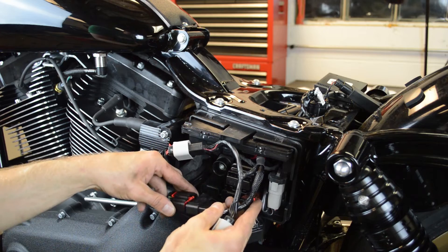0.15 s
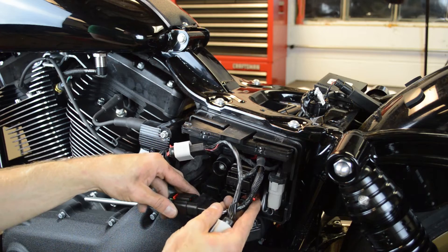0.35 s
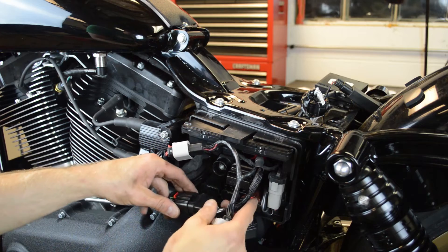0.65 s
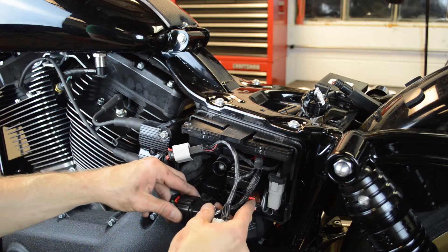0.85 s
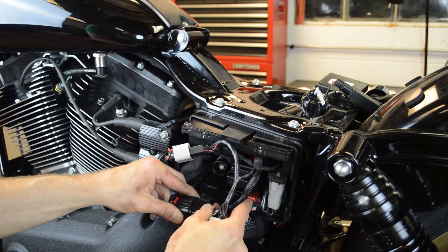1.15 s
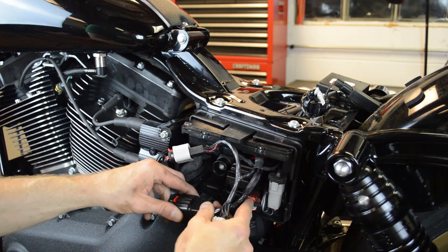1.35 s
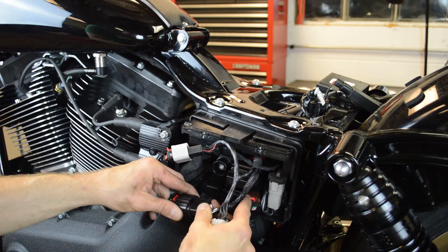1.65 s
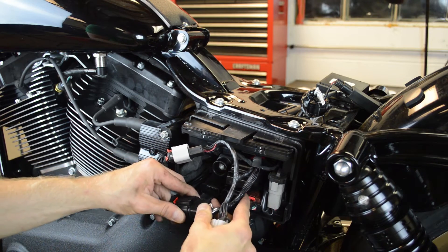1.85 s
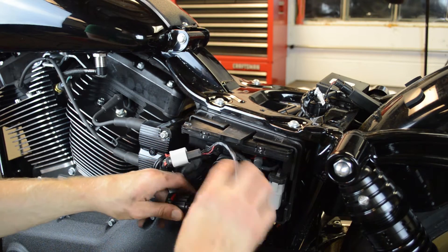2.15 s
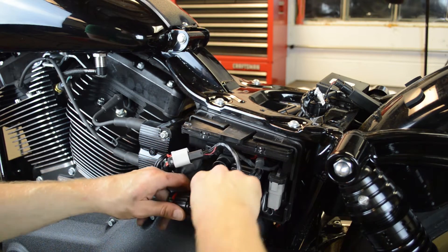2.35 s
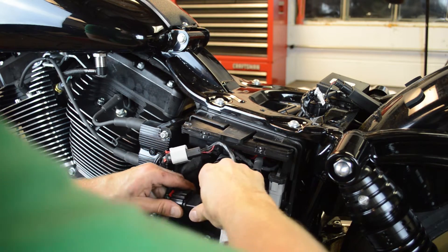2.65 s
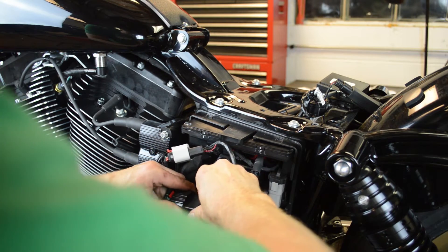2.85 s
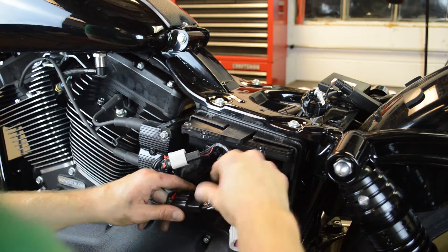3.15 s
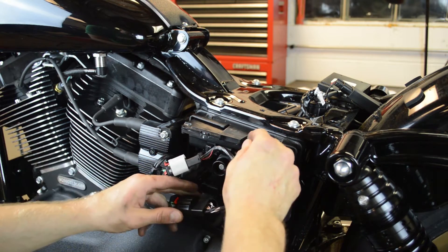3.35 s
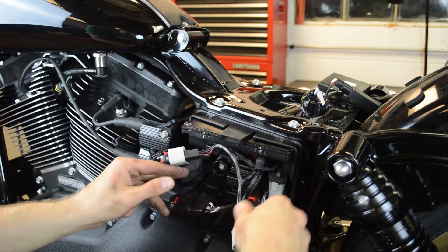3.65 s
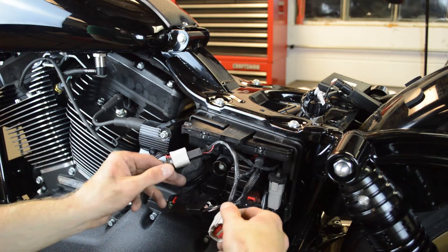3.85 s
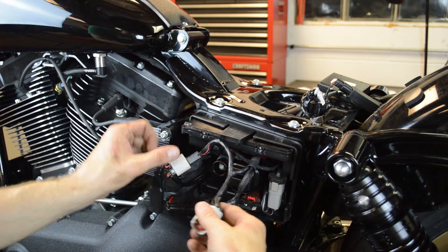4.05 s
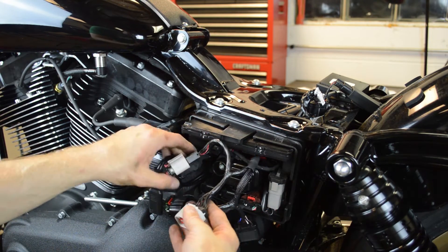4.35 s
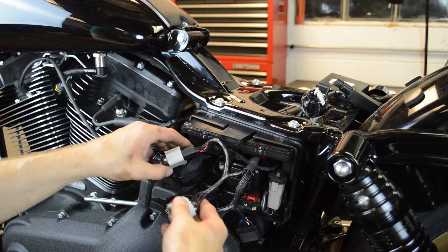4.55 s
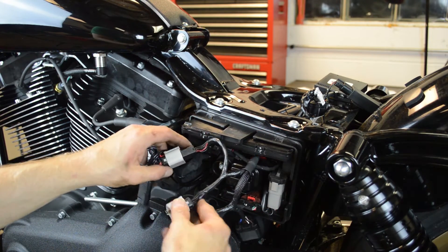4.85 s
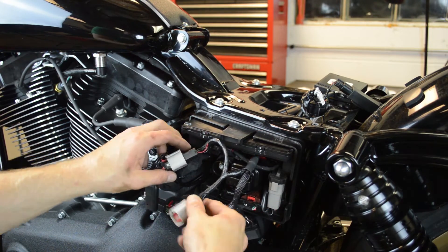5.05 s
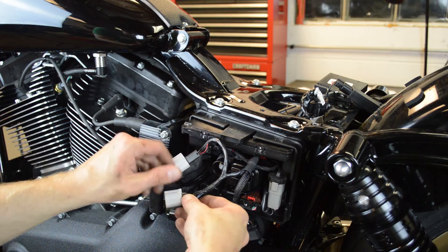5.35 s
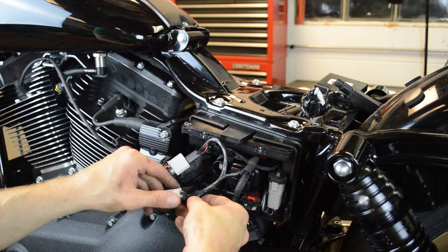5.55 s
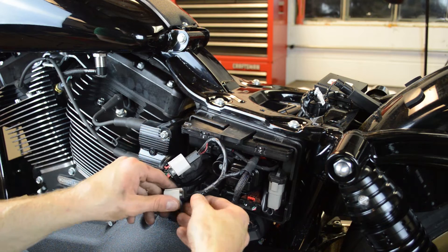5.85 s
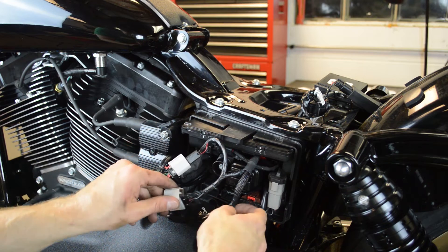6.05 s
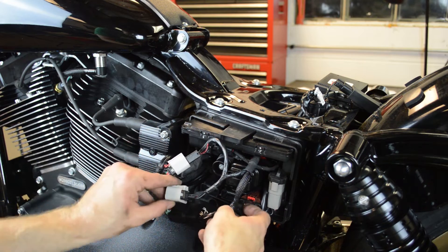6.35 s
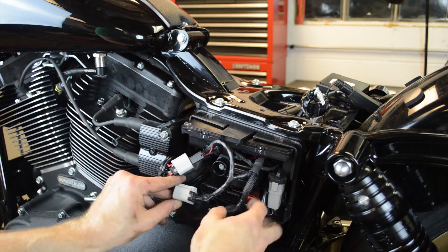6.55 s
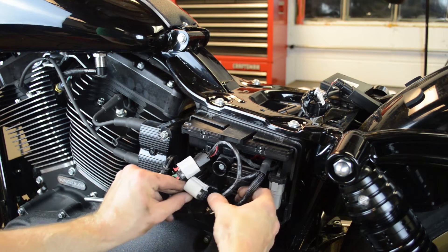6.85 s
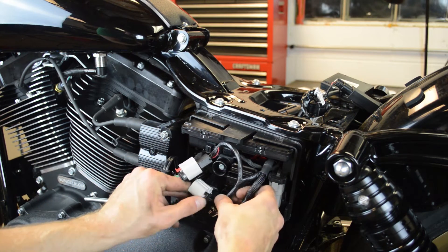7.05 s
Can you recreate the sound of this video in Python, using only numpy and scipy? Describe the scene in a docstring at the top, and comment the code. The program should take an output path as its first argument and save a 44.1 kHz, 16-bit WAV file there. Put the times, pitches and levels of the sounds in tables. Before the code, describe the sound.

Small hard plastic parts snap, tick and scuff under the fingers, heard fairly near with a little room response. The strongest snap is early; irregular small clicks thin out, a knock and cable drag come later, then a crackly pop as the plug leaves its socket. Woody taps, faint scrapes and finally a tighter flurry of rubs and ticks continue over steady ventilation rumble, weak hum and soft hiss.

```python
"""Plastic wiring connectors snap, pop and tick as hands unplug and shift them in a quiet workshop.
Latch and plug are clicks into banks of damped modes with noise cracks; each tick is a rattle ringing one housing mode.
Scrapes, rubs and drags are stick-slip noise under a stroke of pressure; thuds and a bracket ring on sine modes.
A short noise tail answers as the room, over ventilation rumble, wavering mains hum and microphone hiss."""
import sys
import numpy as np
from scipy import signal
from scipy.fft import rfft, irfft
from scipy.io import wavfile

SR = 44100
rng = np.random.default_rng(int(sys.argv[2]) if len(sys.argv) > 2 else 0)


def materialize(psi):
    """Save the field psi as 16-bit PCM at rate SR to the path in sys.argv[1].

    A 1-D psi becomes a single channel; in a 2-D psi each row is a channel.
    """
    bounded = np.clip(np.atleast_2d(psi).T, -1, 1)
    quanta = np.round(bounded * 32767).astype(np.int16)
    wavfile.write(sys.argv[1], SR, quanta)


def voltage_ratio(level):
    """Linear amplitude factor for a level in decibels (scalar or array-like)."""
    return 10 ** (np.asarray(level, float) / 20)


N = 317079

# Swells of the latch's snap: sharp onset, then re-excitations shaping the beating of close modes:
# (time [s], level before mode and layer levels [dB])
LATCH_SWELLS = [(.3529, -14.5), (.3537, -28), (.3568, -23.5), (.3655, -29.5)]
# Modes of the latch: (pitch [Hz], level against the click before the layer level [dB], t60 before the cap [s])
LATCH_MODES = [(880, -28.5, 0.01194), (1230, -20.5, .012), (1550, -21, 0.01), (1890, -26, .02),
               (2400, -2, 0.042), (2730, -12, 0.013), (2650, 4.5, 0.09), (2810, -14.5, 0.06),
               (2994, -10.5, .025), (3740, -16, 0.025), (4020, -15, 0.017), (4340, -16, 0.011),
               (5032, -22.5, 0.0061), (6326, -7.5, 0.018), (7200, -8, .015), (7530, -13, 0.0087),
               (8550, -10, 0.014), (13230, -21, .01), (14590, -25, 0.015)]


def latch():
    """A latch tab snaps: a sharp onset and re-excitations ring its plastic modes, with upper-mid cracks."""
    return struck(LATCH_SWELLS, LATCH_MODES, level_db=-12.5, crack_db=-11, crack_hz=(1800, 10000))


# Clicks as the plug leaves its socket: (time [s], level before mode and layer levels [dB])
PLUG_CLICKS = [(2.8552, -35.5), (2.8564, -40), (2.8596, -36.5), (2.8606, -39), (2.8640, -50)]
# Modes of plug and socket: (pitch [Hz], level against the click before the layer level [dB], t60 before the cap [s])
PLUG_MODES = [(263, -1, 0.015), (419, 12, 0.022), (934, -1, 0.011), (1960, -4, 0.041), (2240, 3.5, 0.012),
              (2670, 8.5, 0.0089), (3000, -13, 0.016), (3910, 15.5, 0.0041), (4900, -21, 0.0088),
              (5900, -23, .01), (7640, 2.5, 0.023), (9000, -21, 0.015), (11100, 6.5, 0.018),
              (11600, -1.5, 0.019), (12600, -9, 0.0089), (14500, 9, .01)]


def plug():
    """A plug pops apart: a cluster of clicks rings short modes under a broad crack."""
    return struck(PLUG_CLICKS, PLUG_MODES, level_db=-8.5, crack_db=3.5, crack_hz=(500, 16000))


def struck(excitations, modes, level_db, crack_db, crack_hz, spread_db=1):
    """Every excitation clicks all modes with strengths of its own and adds a dry crack of a few ms."""
    out, t = np.zeros(N), np.arange(1024) / SR
    at = [round(s * SR) for s, db in excitations]
    click_db = np.array(excitations)[:, 1]
    for k, (hz, mode_db, t60) in enumerate(modes):
        clicks = np.zeros(N)
        uneven_db = spread_db * rng.standard_normal(len(at))
        clicks[at] = voltage_ratio(click_db + mode_db + level_db + uneven_db)
        capped_t60 = np.clip(t60, .004, .005 + 55 / hz)  # high modes must die sooner
        out += (-1) ** k * ring(clicks, hz, capped_t60)
    for i, (s, db) in zip(at, excitations):
        burst = rng.standard_normal(len(t)) * np.exp(-t / 0.0012)
        out[i:i + len(t)] += voltage_ratio(db + crack_db) * band(burst, *crack_hz)
    return out


# Housings and wires touching: (time [s], peak of the ring [dB], ring [Hz], peak of the bright crack over the ring [dB])
TOUCHES = [(.0603, -59, 2760, -9), (.195, -69, 2700, 1), (.2818, -63, 1450, 0), (.4544, -45, 3360, -9),
           (.465, -54, 6200, -10), (.524, -58, 4600, -8), (.618, -54.5, 2540, -3), (.6804, -59.5, 1450, 5),
           (.7561, -47.5, 3740, -5), (.784, -52.5, 2400, -1), (.8613, -56, 1420, -8),
           (.8645, -31, 9800, -19), (.9294, -65, 9200, -9), (1.106, -56.5, 3140, -5),
           (1.1688, -48, 4550, -2), (1.3473, -63, 1250, 7), (1.388, -56.5, 11400, -16),
           (1.4528, -66, 1180, 14), (1.478, -56.5, 3290, -2), (1.695, -60.5, 2300, -3),
           (1.8696, -56, 6800, 0), (2.074, -40, 6430, -2.5), (2.0869, -54, 1290, 0), (2.6646, -51, 4700, 0),
           (2.655, -57, 4700, -8), (2.7436, -56.5, 4670, 2), (2.817, -50, 2550, 1.5), (3.028, -57, 2380, 6),
           (3.087, -50, 4600, -2), (3.1876, -47, 3810, 7), (3.7423, -46.5, 6500, .6),
           (3.7608, -61, 8780, 2), (3.7954, -68, 1300, 19), (3.9503, -51.5, 2170, -7),
           (4.036, -57, 4300, -8), (4.057, -58, 2200, 0), (4.066, -53, 2340, 1.5),
           (4.1188, -40.5, 1250, 2.5), (4.2682, -40.5, 1287, 5.5), (4.355, -59, 3500, -12),
           (4.6582, -43.5, 1290, 1.5), (4.8915, -56.5, 1630, 2), (4.9215, -51, 3540, 4.5),
           (5.444, -61, 4600, -2), (6.553, -58, 6500, 3), (6.587, -53, 1270, -13), (6.6594, -58, 1550, 0),
           (6.788, -56.5, 2210, -13), (6.8449, -45, 12100, -17), (6.8713, -49, 1550, 1),
           (7.1028, -48, 1280, 2), (7.1388, -47, 1260, -6), (7.1553, -49, 1520, 9)]
FIRM_TICK_DB = -50  # strength at which the next settings hold as they stand
KNOCK_DB, KNOCK_PER_DB = -13.5, -0.23  # knock against ring; change per dB of strength
CONTACT_MS, CONTACT_MS_PER_DB = 3.6, -0.02  # decay time of the rattle; firmer touches rattle slightly shorter


def ticks():
    """A sharp contact with a short rattle rings one damped housing mode, with a dull knock and a bright crack."""
    out, t = np.zeros(N + 2048), np.arange(2048) / SR
    noises = rng.standard_normal((len(TOUCHES), len(t)))
    for (s, peak_db, hz, crack_db), noise in zip(TOUCHES, noises):
        firmness_db = peak_db - FIRM_TICK_DB
        contact_ms = CONTACT_MS + CONTACT_MS_PER_DB * firmness_db
        knock_db = KNOCK_DB + KNOCK_PER_DB * firmness_db
        force = noise * np.exp(-t / (np.clip(contact_ms, .1, 20) / 1000))
        force[0] = 7.0  # the first sharp contact
        mode = rms_one(resonance(force, hz, 250 + hz * .08))
        clatter = rms_one(band(band(force, 1500, 8000), 1500, 8000))
        parts = [mode + clatter * .6, band(force, 260, 2300), band(force, 7700, 20000)]
        body, knock, crack = [p / np.abs(p).max() for p in parts]
        i = round(s * SR)
        out[i:i + len(t)] += voltage_ratio(peak_db) * (body + voltage_ratio(knock_db) * knock + voltage_ratio(crack_db) * crack)
    return out[:N]


# Housings scraping: (time [s], length [s], hollow resonance [Hz], resonance rms before the pressure shape [dB])
SCRAPE_STROKES = [(0.02, 0.032, 2660, -74), (.052, 0.034, 2750, -71.5), (0.156, 0.1, 2650, -66.5),
                  (.444, 0.048, 3180, -66), (0.683, 0.035, 4470, -77.5), (.727, 0.046, 1050, -67.5),
                  (.733, 0.022, 10200, -71), (0.77, .024, 4600, -67.5), (0.79, .063, 2600, -79),
                  (0.877, 0.064, 4470, -76), (1.012, .026, 4530, -75), (1.156, 0.022, 4650, -73),
                  (1.473, 0.078, 630, -77), (2.06, .053, 6400, -74), (2.073, 0.13, 472, -64.5),
                  (2.125, 0.16, 3400, -79), (2.526, 0.22, 623, -70.5), (3.018, 0.087, 2400, -72),
                  (3.016, 0.13, 11200, -74.5), (3.026, 0.12, 4530, -75.5), (3.256, 0.072, 6900, -79.5),
                  (3.466, .12, 12070, -73.5), (3.514, 0.12, 11100, -70), (3.836, 0.11, 620, -76.5),
                  (3.983, 0.075, 10300, -72.5), (4.046, 0.091, 2250, -67), (4.12, 0.047, 387, -60.5),
                  (4.828, .11, 6570, -73.5), (5.226, 0.091, 3780, -79), (5.442, 0.032, 4300, -70.5),
                  (5.621, 0.066, 4300, -74), (5.833, 0.11, 4620, -77.5), (5.855, 0.088, 6020, -73),
                  (6.111, 0.037, 5030, -69), (6.113, 0.028, 2820, -73.5), (6.405, 0.045, 5900, -67),
                  (6.556, 0.019, 2660, -71.5), (6.579, 0.052, 2880, -66), (6.678, 0.059, 603, -67.5),
                  (6.953, 0.037, 595, -72.5), (7.13, .025, 3000, -66.5), (7.153, 0.041, 10200, -64),
                  (7.179, .018, 3470, -52.5)]
SCRAPE_BROAD_DB, LOW_SCRAPE_HZ = -11.5, 1800  # broad friction: drag under low scrapes, hiss around high ones
SCUFF_DB, SCUFF_LEAD_S, SCUFF_S = -28, 0.0015, .018  # scuff against the tick's level, head start, length


def scrapes(friction, hiss, drag):
    """Housings scrape through one hollow resonance each; every tick brings a short scuff at its ring."""
    out = np.zeros(N)
    scuffs = [(s - SCUFF_LEAD_S, SCUFF_S, hz, db + SCUFF_DB) for s, db, hz, crack_db in TOUCHES]
    for s, length, hz, db in SCRAPE_STROKES + scuffs:
        part, pressure = stroke(s, length)
        broad = drag if hz < LOW_SCRAPE_HZ else hiss
        out[part] += pressure * voltage_ratio(db) * (hollow(friction[part], hz) + voltage_ratio(SCRAPE_BROAD_DB) * broad[part])
    return out


# Fingers rubbing cable and plastic: (time [s], length [s], hiss level before the pressure shape [dB])
RUB_STROKES = [(0.02, .035, -82), (.158, 0.08, -75), (0.488, 0.045, -72), (0.582, 0.056, -69.5),
               (0.747, 0.022, -61.5), (1.044, .02, -74), (1.162, 0.025, -71), (1.336, 0.026, -70),
               (1.8, 0.018, -72), (3.183, 0.042, -73), (3.631, .023, -73.5), (3.955, 0.11, -75.5),
               (4.285, 0.083, -72.5), (4.397, 0.041, -79), (4.63, 0.059, -69), (4.682, 0.07, -73),
               (4.94, 0.095, -74), (5.206, .11, -71), (5.439, 0.079, -70.5), (5.62, 0.077, -69.5),
               (6.103, 0.038, -64), (6.237, 0.067, -64), (6.28, 0.015, -66), (6.621, 0.074, -66),
               (6.744, 0.045, -71.5), (6.817, 0.078, -63.5), (6.878, 0.085, -72), (7.001, 0.12, -65),
               (7.129, 0.023, -66), (7.175, 0.013, -53.5)]
RUB_HOLLOW_HZ, RUB_HOLLOW_DB, RUB_DRAG_DB = 6500, -8, -15.5  # sleeve resonance and harness tug, dB against hiss


def rubs(friction, hiss, drag):
    """Fingers rub out a broad hiss that wakes the sleeve's resonance and tugs the harness a little."""
    out = np.zeros(N)
    for s, length, db in RUB_STROKES:
        part, pressure = stroke(s, length)
        sleeve = voltage_ratio(RUB_HOLLOW_DB) * hollow(friction[part], RUB_HOLLOW_HZ)
        tug = voltage_ratio(RUB_DRAG_DB) * drag[part]
        out[part] += pressure * voltage_ratio(db) * (hiss[part] + sleeve + tug)
    return out


# Harness dragged along the frame: (time [s], length [s], level before the pressure shape [dB])
DRAG_STROKES = [(0.757, 0.02, -61.5), (0.867, 0.017, -62), (1.318, 0.049, -72), (2.083, 0.17, -75),
                (2.2, 0.37, -71), (2.504, .25, -78), (3.033, 0.1, -76.5), (3.946, 0.017, -64.5),
                (4.046, 0.077, -64.5), (4.262, 0.068, -75), (4.655, 0.029, -63), (4.677, .052, -68.5),
                (6.07, 0.045, -77), (6.235, 0.028, -84), (6.541, 0.039, -68), (6.578, 0.051, -59.5),
                (6.619, 0.063, -66.5), (6.777, 0.041, -66), (6.826, 0.065, -65.5), (6.88, .075, -70.5),
                (7.018, 0.071, -72), (7.145, 0.057, -55.5)]


def drags(drag):
    """The harness drags dully along the frame: low-banded friction under each stroke."""
    out = np.zeros(N)
    for s, length, db in DRAG_STROKES:
        part, pressure = stroke(s, length)
        out[part] += pressure * voltage_ratio(db) * drag[part]
    return out


def slides():
    """Scrapes, rubs and drags draw on the same running friction, hiss and dull drag."""
    friction = stick_slip(1500, spread_db=3.0, smooth=0.75)
    hiss = patchy_hiss(friction, patchy_db=1.8)
    dull = band(stick_slip(800, spread_db=3.0, smooth=0.78), 250.2, 1482)
    drag = rms_one(band(dull, 92, 2600))
    return scrapes(friction, hiss, drag) + rubs(friction, hiss, drag) + drags(drag)


def stick_slip(slips_per_s, spread_db, smooth):
    """Skin friction: uneven tiny slips over a smooth noise, wandering in level together."""
    happens = rng.random(N) < slips_per_s / SR
    height = voltage_ratio(spread_db * np.minimum(rng.exponential(1, N), 4))
    slips = happens * height * rng.choice([-1, 1], N)
    return (rms_one(slips) + smooth * rng.standard_normal(N)) * voltage_ratio(2.5 * drift(40))


# Tone of the friction hiss: (frequency [Hz], relative level per Hz [dB])
HISS_TONE = [(2200, -3), (4000, -0.5), (6500, 5.5), (9000, -2), (11500, 3.5), (14500, -0.5), (16500, -4)]


def patchy_hiss(friction, patchy_db):
    """Broad hiss whose bands swell and fade on their own as the grip changes."""
    edges = np.geomspace(2000, 17000, 8)
    hiss = np.zeros(N)
    for k in range(7):
        hiss += (-1) ** k * band(friction, edges[k], edges[k + 1]) * voltage_ratio(patchy_db * drift(6.8))
    return coloured(hiss, HISS_TONE)


def hollow(friction, hz):
    """Friction heard through a hollow resonance that widens with pitch; rms 1."""
    return rms_one(resonance(friction, hz, 150 + hz * 0.057))


STROKE_SKEW, STROKE_FLAT = 0.82, 0.53  # exponents under 1: pressure peaks early; flat-topped


def stroke(s, length):
    """Samples of one stroke and the pressure that swells and eases along it."""
    i, count = round(s * SR), round(max(length, .005) * SR)
    swell = np.sin(np.pi * np.linspace(0, 1, count) ** STROKE_SKEW)
    pressure = swell[:N - i].clip(0) ** STROKE_FLAT
    return slice(i, i + len(pressure)), pressure


# Harness bumping the frame: (time [s], peak [dB], lower mode [Hz], its t60 [s])
BUMPS = [(.739, -68, 1040, 0.027), (0.7846, -46.5, 652, 0.05), (1.5, -61.5, 630, 0.097),
         (1.93, -59.5, 646, 0.065), (2.089, -47, 457, 0.047), (2.138, -47, 243, 0.027),
         (3.06, -55, 613, .05), (3.31, -62, 628, 0.079), (4.147, -54, 425, 0.035),
         (4.89, -61.5, 906, 0.024), (6.08, -64, 695, 0.042), (6.245, -63.5, 740, .04),
         (6.588, -49, 1060, .03), (6.845, -54, 980, 0.021), (7.062, -56, 1380, 0.035)]


def thuds():
    """A soft short push rings a low damped mode with a weaker one at 1.6 times its pitch."""
    out, t = np.zeros(N), np.arange(8192) / SR
    noises = rng.standard_normal((len(BUMPS), len(t)))
    for (s, peak_db, hz, t60), noise in zip(BUMPS, noises):
        push = (1 + 0.23 * noise) * np.exp(-t / 0.000091) + 0.12 * noise * np.exp(-t / 0.009)
        thud = ring(push, hz, t60) + 0.3 * ring(push, hz * 1.6, t60 * 1.2)
        i = round(s * SR)
        out[i:i + len(t)] += (voltage_ratio(peak_db) * thud / np.abs(thud).max())[:N - i]
    return out


# Nudge on a metal bracket: (time [s], peak [dB])
BRACKET_NUDGE = (2.088, -78.5)


def bracket():
    """A nudged metal bracket rings faintly: one thin tone dying slowly."""
    s, peak_db = BRACKET_NUDGE
    tap = np.zeros(N)
    tap[round(s * SR)] = voltage_ratio(peak_db)
    return ring(tap, hz=1660, t60=1.3)


# Decay of the room: (frequency [Hz], t60 before the early scatter is added [s])
ROOM_DECAY = [(300, 1), (800, 1), (2000, 0.44), (5500, 0.52), (14000, 0.31)]
ROOM_DB, ROOM_GAP_S = -12, .006  # tail energy against a unit click; middle of its fade-in
NEAR_DB, NEAR_T60_S = 11, 0.033  # dense early scatter from the machine beside the hands


def workshop(x):
    """Diffuse tail: noise that dies band by band, denser early on, fading in after a short gap."""
    t, edges = np.arange(SR) / SR, 150 * 2 ** np.arange(0, 7.5)
    tail = np.zeros(SR)
    for lo, hi in zip(edges, edges[1:]):
        t60 = at_hz(ROOM_DECAY, np.sqrt(lo * hi))
        tail += band(rng.standard_normal(SR), lo, hi) * voltage_ratio(-60 * t / t60)
    scatter = 1 + voltage_ratio(NEAR_DB - 60 * t / NEAR_T60_S)  # multiplies the tail, so it dies with it
    tail = tail * scatter * np.clip(t / ROOM_GAP_S - .5, 0, 1)
    return voltage_ratio(ROOM_DB) * signal.fftconvolve(x, tail / np.sqrt(np.sum(tail ** 2)))[:N]


# Ventilation rumble sloping into microphone hiss: (frequency [Hz], relative level per Hz [dB])
AIR_TONE = [(8.8, -3), (15, 8.5), (40, -3), (123, -15.5), (184, -23.5), (247, -24.5), (312, -32),
            (405, -35), (483, -28.5), (527, -38.5), (972, -38.5), (1550, -48), (11300, -50.5),
            (14700, -51.5), (16000, -60)]
AIR_DB = -51  # rms
# Mains harmonics: (frequency [Hz], rms about which each wavers [dB])
HUM_LINES = [(120, -73), (240, -79), (360, -85), (480, -84), (600, -92)]


def air():
    """Steady rumble sloping into hiss, with mains harmonics that waver a little."""
    t = np.arange(N) / SR
    hum = np.zeros(N)
    for line_hz, db in HUM_LINES:
        level = np.sqrt(2) * voltage_ratio(db + 0.56 * drift(4.9))
        hum += level * np.sin(2 * np.pi * (line_hz * t + rng.random()))
    return voltage_ratio(AIR_DB) * coloured(rng.standard_normal(N), AIR_TONE) + hum


def rms_one(x):
    """Scale to unit rms."""
    return x / np.sqrt(np.mean(x ** 2) + 1e-20)


def at_hz(points, hz):
    """Read a table along log frequency."""
    table_hz, value = np.array(points).T
    return np.interp(np.log(hz), np.log(table_hz), value)


def band(x, lo_hz, hi_hz):
    """Butterworth band-pass."""
    sos = signal.butter(2, [lo_hz, min(hi_hz, .45 * SR)], "band", fs=SR, output="sos")
    return signal.sosfilt(sos, x)


def drift(rate):
    """Slow random wander of spread 1: low-passed noise (corner rate in Hz) drawn 200 times a second."""
    steps = rng.standard_normal(int(N / SR * 200) + 2)
    r = np.exp(-2 * np.pi * rate / 200)
    wander = rms_one(signal.lfilter([1], [1, -r], steps))
    return np.interp(np.arange(N) * 200 / SR, np.arange(len(steps)), wander)


def ring(x, hz, t60):
    """A damped mode: a unit click sets a sine of height 1 ringing."""
    r, w = voltage_ratio(-60 / (t60 * SR)), 2 * np.pi * hz / SR
    return signal.lfilter([0, np.sin(w)], [1, -2 * r * np.cos(w), r * r], x + 1e-18)


def resonance(x, hz, width):
    """Two-pole resonance, width in Hz, with gain 1 on top."""
    r = np.exp(-np.pi * width / SR)
    gains = np.array([1, 0, -1]) * (1 - r * r) / 2
    return signal.lfilter(gains, [1, -2 * r * np.cos(2 * np.pi * hz / SR), r * r], x)


def coloured(x, spectrum):
    """Shape by a spectrum; rms 1."""
    hz = np.maximum(np.arange(len(x) // 2 + 1) * SR / len(x), 1)
    return rms_one(irfft(rfft(x) * voltage_ratio(at_hz(spectrum, hz)), len(x)))


def scene():
    """Handling sounds, their room tail and the background."""
    hands = latch() + plug() + ticks() + slides() + thuds() + bracket()
    return (hands + workshop(hands) + air())[None]


def top_cut(x):
    """Nothing passes above the cut-off."""
    return signal.sosfilt(signal.butter(12, 16510, fs=SR, output="sos"), x)


def record(dry):
    """A steep low-pass takes off the top, 60 dB down from 16650 Hz."""
    mix = signal.sosfilt(signal.cheby2(14, 60, 16650, fs=SR, output="sos"), dry)
    return top_cut(mix)


dry = scene()
out = record(dry)
materialize(out)
```